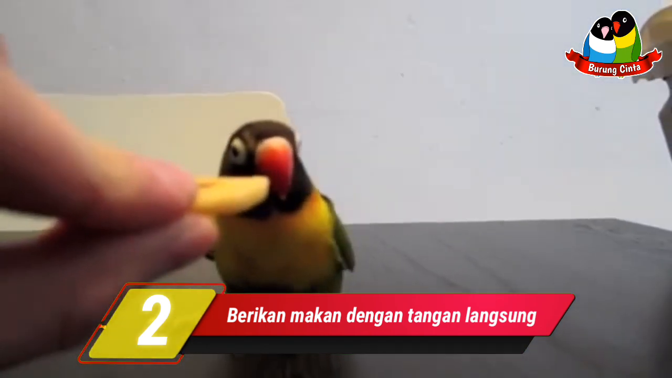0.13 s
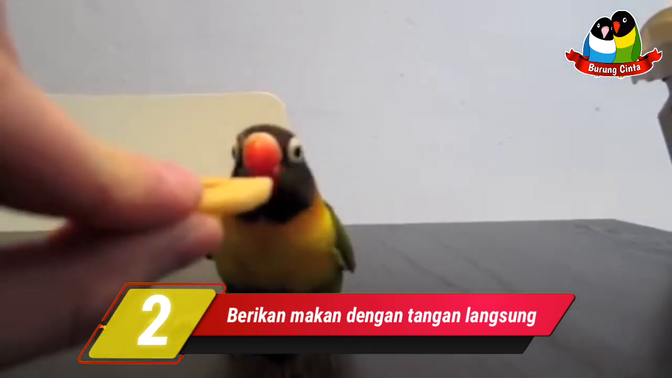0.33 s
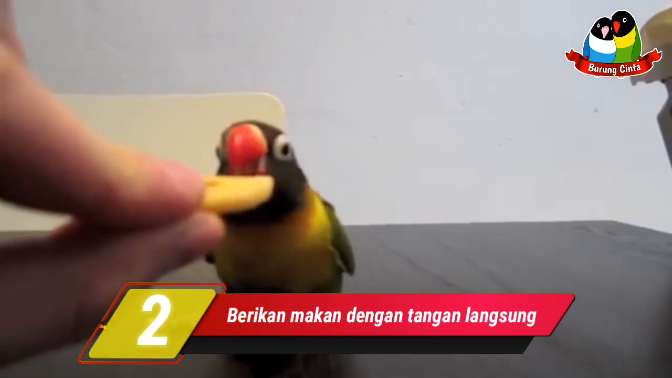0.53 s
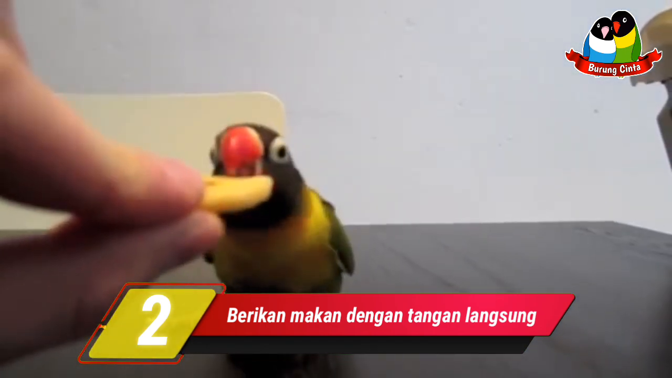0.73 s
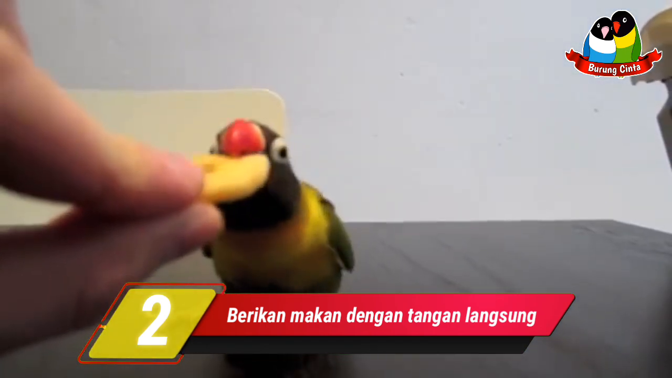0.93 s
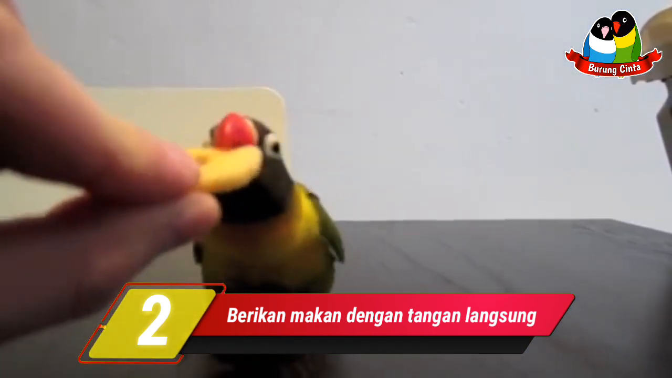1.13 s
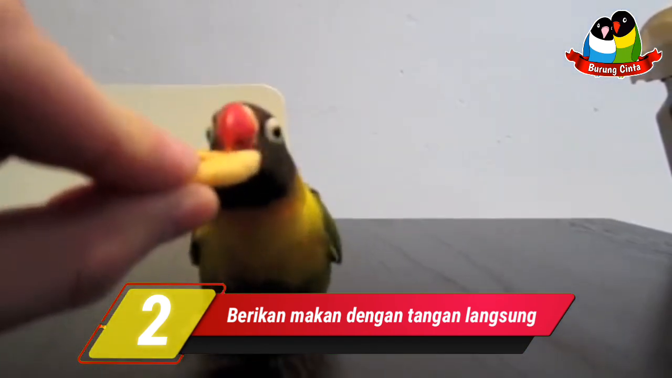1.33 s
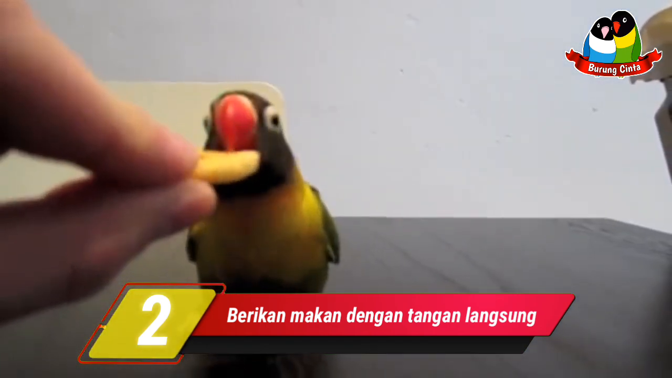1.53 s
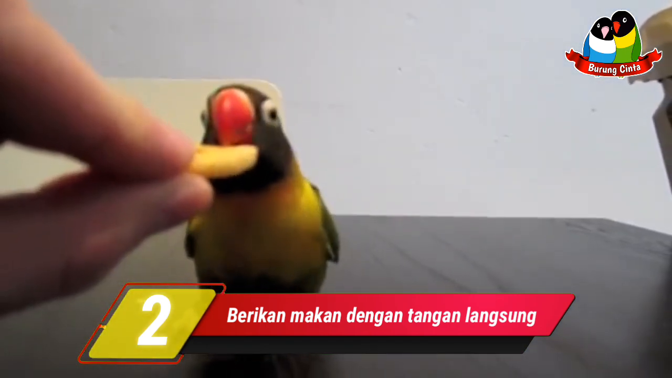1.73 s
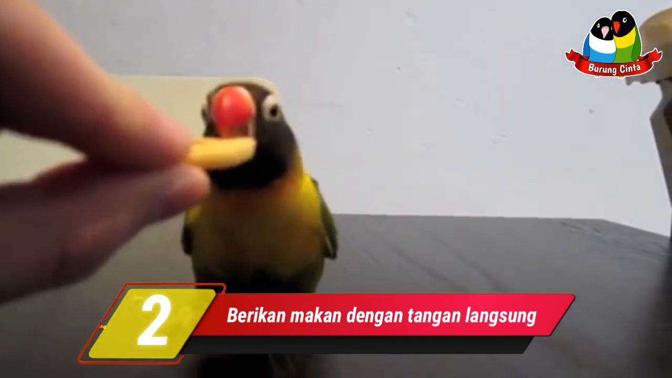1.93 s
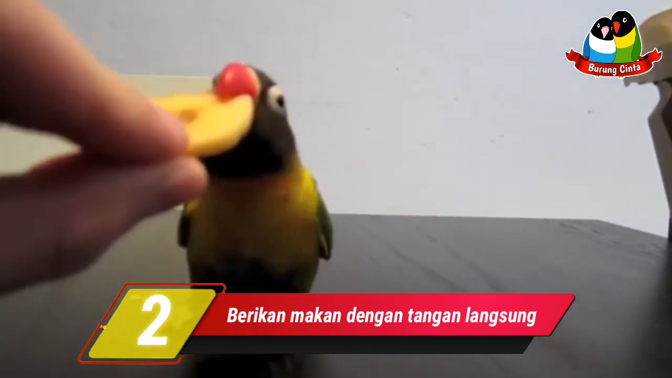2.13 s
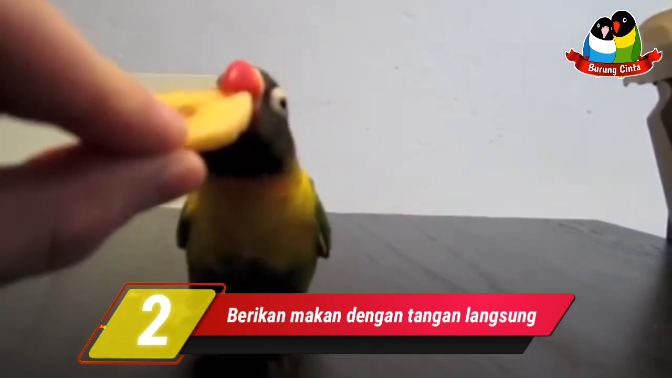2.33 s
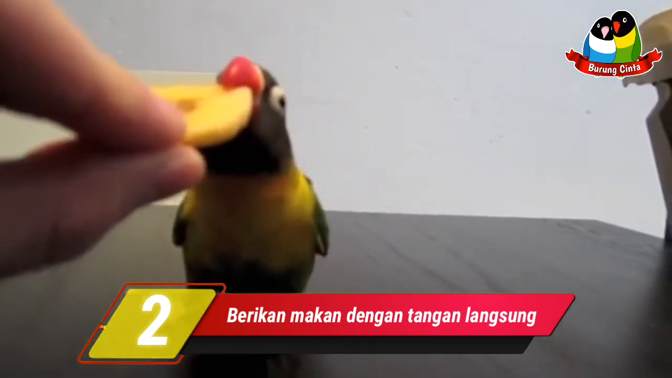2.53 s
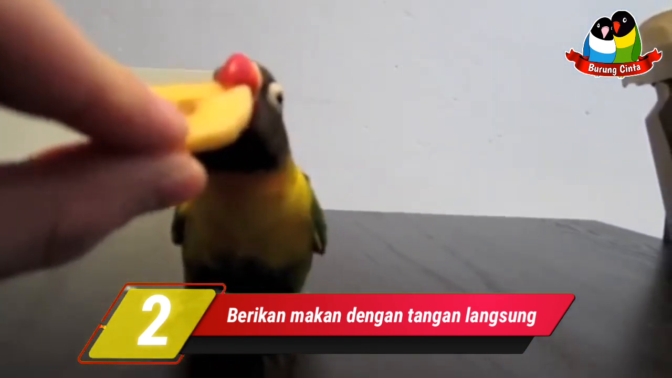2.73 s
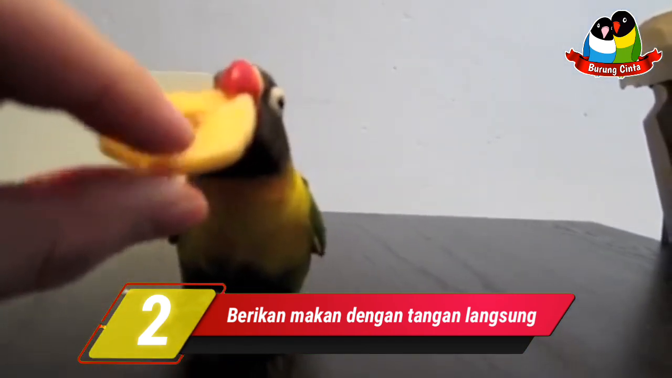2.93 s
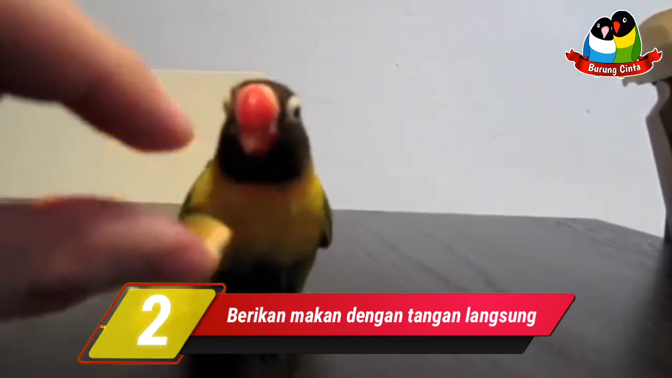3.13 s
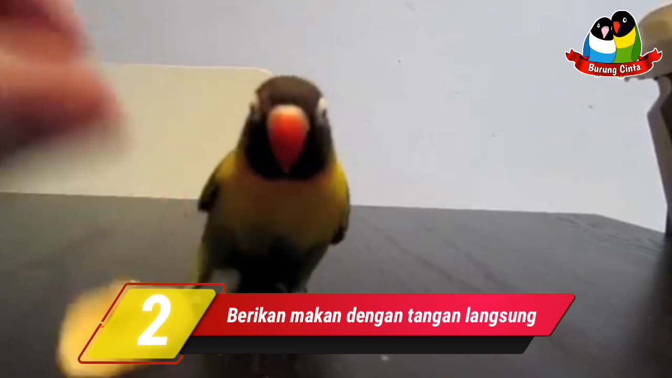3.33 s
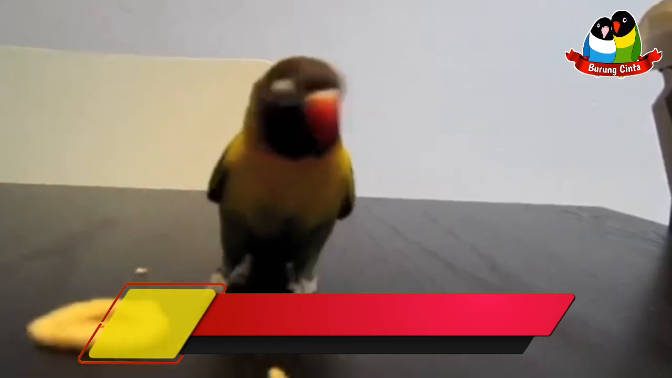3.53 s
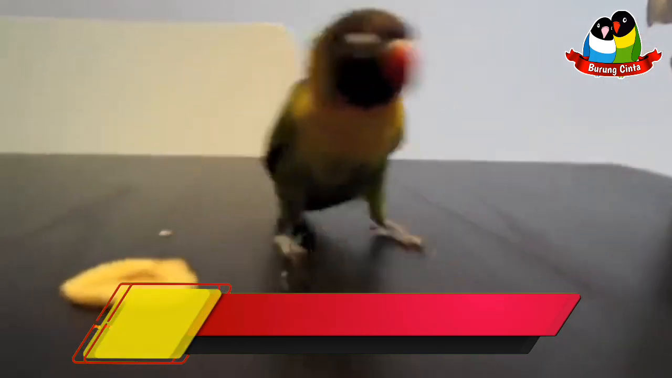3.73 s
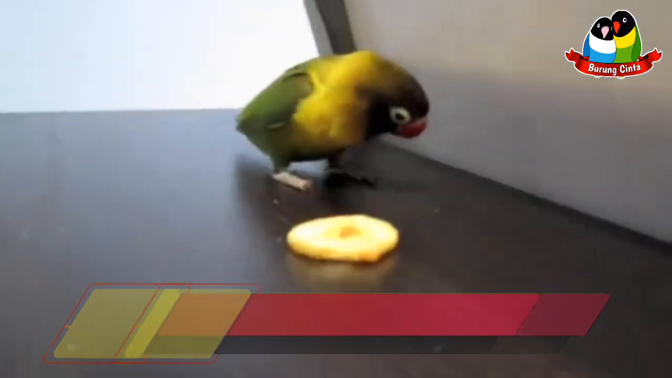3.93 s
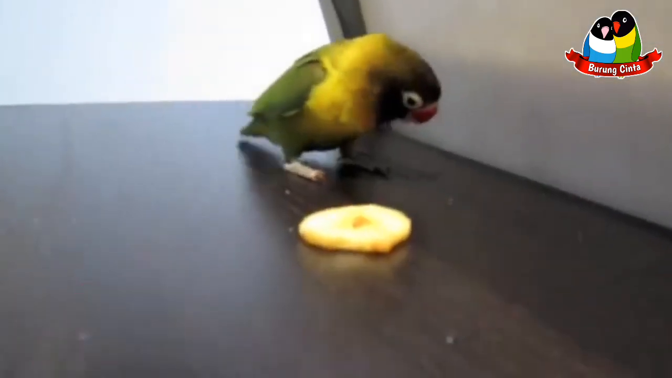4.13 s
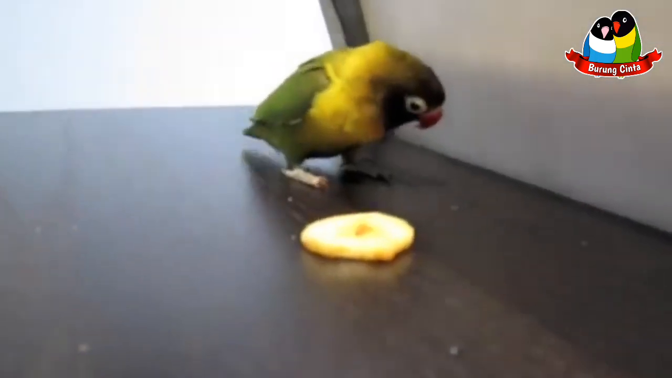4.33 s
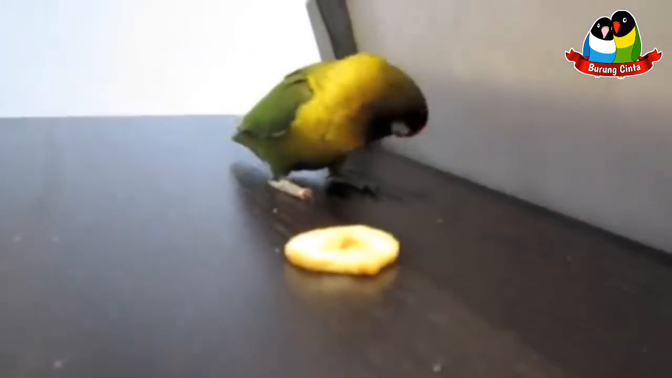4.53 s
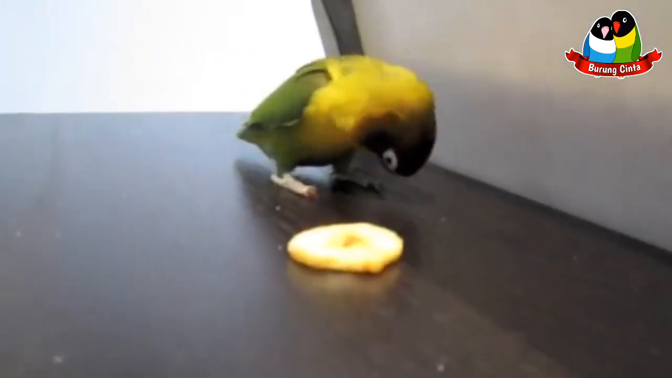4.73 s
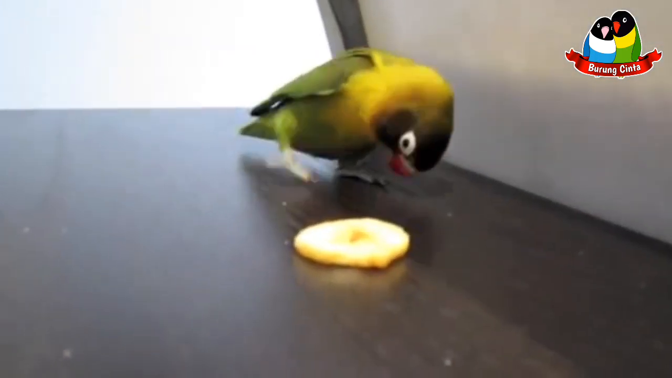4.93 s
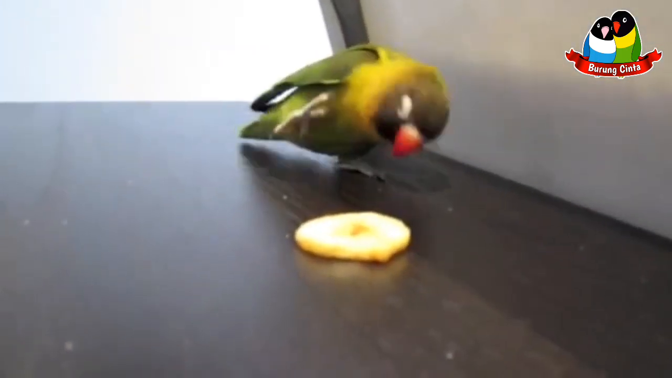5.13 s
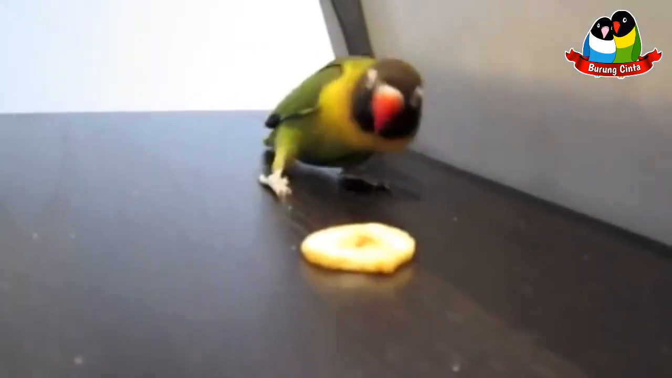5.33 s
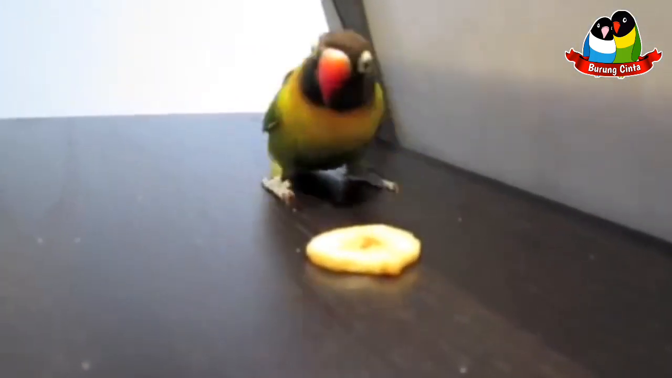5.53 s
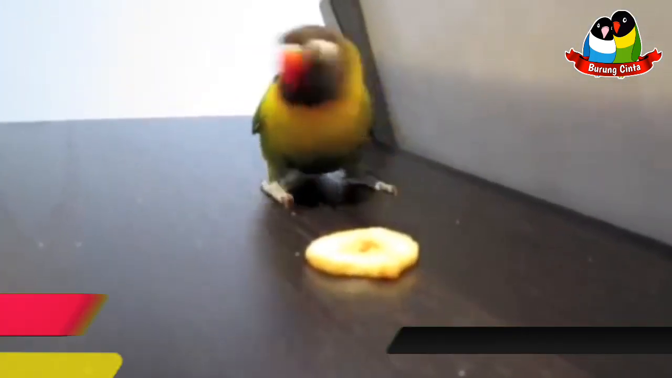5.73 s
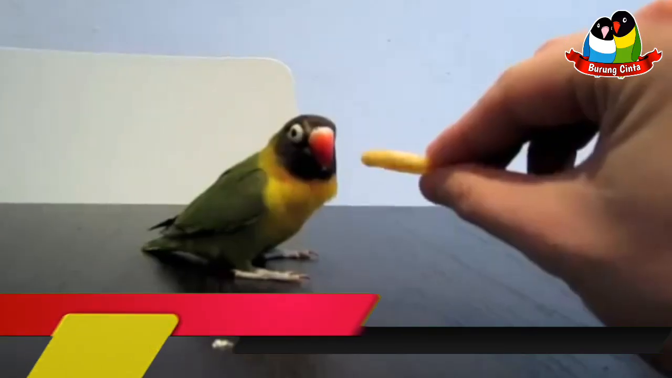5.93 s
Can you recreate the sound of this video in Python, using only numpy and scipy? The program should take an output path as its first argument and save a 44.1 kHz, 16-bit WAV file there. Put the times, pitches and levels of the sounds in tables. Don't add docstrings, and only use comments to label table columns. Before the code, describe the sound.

A small parrot nibbles a dry chip with faint crackles, the chip snaps and clatters loudly onto a table, then two short whistled chirps and claw ticks.

```python
import sys
import numpy as np
from scipy import signal
from scipy.fft import rfft, irfft, next_fast_len
from scipy.io import wavfile
from scipy.ndimage import uniform_filter1d, map_coordinates

SR = 44100
rng = np.random.default_rng(int(sys.argv[2]) if len(sys.argv) > 2 else 0)


def transcribe(u):
    v = np.clip(np.atleast_2d(u).T, -1, 1)
    q = np.round(v * 32767).astype(np.int16)
    wavfile.write(sys.argv[1], SR, q)


def natural_amplitude(level_db):
    exponent = np.asarray(level_db, float) / 20
    return 10 ** exponent


N = 267687
HZ = np.fft.rfftfreq(4096, 1 / SR)
JOIN_S = [3.897, 5.897]

# (centre [Hz], width [Hz], level [dB])
CRUST = [(900, 1700, 18), (2200, 2100, 4), (3700, 2600, -17.5), (5900, 730, -2), (8780, 1900, 3.5),
         (12420, 830, -4)]


def unit(x):
    return x / np.sqrt(np.mean(x ** 2) + 1e-20)


def along(points, hz):
    f, v = np.transpose(points)
    return np.interp(np.log(hz + 1), np.log(f + 1), v)


def curves(rows, t):
    s, *cols = np.transpose(rows)
    return [np.interp(t, s, c) for c in cols]


def resonances(modes):
    total = 0
    for k, (centre, width, db) in enumerate(modes):
        damping = 1j * HZ * width
        total = total + (-1) ** k * natural_amplitude(db) * damping / (centre * centre - HZ * HZ + damping)
    return total


def shaped(x, response):
    y = irfft(rfft(x, 4096) * response)[:3000]
    return y / np.abs(y).max()


def add(track, s, sound):
    track[round(s * SR):][:len(sound)] += sound


def ticks(rows, life, colour):
    track, t = np.zeros(N + SR), np.arange(1024) / SR
    for s, db, hz, octaves in rows:
        spray = 0.35 * rng.standard_normal(len(t)) * natural_amplitude(-60 * t / (3 * life))
        spray[0] = 1.1
        width = hz * max(1.7 * octaves, 0.2)
        body = 0.1 / (1 + 1j * HZ / 2200) ** 2
        band = resonances([(hz, width, 0)]) ** 2 - body
        add(track, s, natural_amplitude(db + 0.5) * shaped(spray, band * colour))
    return track[:N]


def duck_db(t):
    # (time [s], hold [s], hiss gain [dB], rumble gain [dB])
    ducks = [
        (3.173, 0.39, 2, -6),
        (4.215, 0.25, -6.5, -3.5),
        (4.794, 0.51, 3.4, 2.5),
    ]
    attack_s, release_s = 0.05, 0.24
    total = 0
    for s, hold, *db in ducks:
        corners = np.cumsum([s, attack_s, hold, release_s])
        total = total + np.outer(db, np.interp(t, corners, [0, 1, 1, 0]))
    return total


def rush(spectrum, patchy_db):
    hz, _, z = signal.stft(rng.standard_normal(N + 2048), SR, nperseg=2048)
    field = uniform_filter1d(rng.standard_normal(z.shape), 12, 0)
    field = uniform_filter1d(field, 3, 1)
    gain_db = along(spectrum, hz)[:, None] + patchy_db * unit(field)
    return unit(signal.istft(z * natural_amplitude(gain_db), SR, nperseg=2048)[1][:N])


def room_tone():
    # (frequency [Hz], density [dB])
    hiss = [(59, -28), (100, -1.5), (140, -5.5), (200, -2.5), (586, -8), (787, -10.5), (2120, -16.5),
            (5230, -21), (10900, -28), (15300, -35)]
    # (frequency [Hz], density [dB])
    rumble = [(8.8, -27), (15, -0.5), (59, 0.5), (86, -8.5), (107, -14), (119, -17), (160, -12.5),
              (210, -38.5), (350, -120)]
    # (start [s], murmur [dB], rumble [dB], hiss [dB])
    takes = [
        (0, -59, -61, -76),
        (3.897, -58, -59.5, -76),
        (5.897, -58, -57, -76),
    ]
    t = np.arange(N) / SR
    murmur_db, rumble_db, hiss_db = np.array(takes)[np.searchsorted(JOIN_S, t), 1:].T
    drift = map_coordinates(rng.standard_normal(60), [t * 8])
    swell_db = 1.55 * map_coordinates(rng.standard_normal(40), [t * 2])
    hum = natural_amplitude(-60 + 2 * drift) * np.sin(2 * np.pi * 60 * t + 0.37 * drift)
    air = rush(hiss, patchy_db=0.88)
    murmur = signal.filtfilt(*signal.butter(1, 0.2), air)
    low = natural_amplitude(rumble_db + 3) * rush(rumble, patchy_db=1.0) + hum
    high_db, low_db = duck_db(t)
    steady = natural_amplitude(hiss_db + 14.5 + high_db) * (air - murmur) + natural_amplitude(low_db) * low
    return natural_amplitude(murmur_db + swell_db + 0.35 * high_db) * murmur + steady


def far_calls():
    # (time [s], level [dB], pitch [Hz], half length [s])
    calls = [
        (.665, -68, 2150, .025),
        (4.85, -65, 3900, .035),
        (5.085, -64, 3900, .06),
        (5.09, -70, 3300, .025),
        (5.385, -63, 950, .045),
    ]
    track = np.zeros(N + SR)
    for s, db, hz, length in calls:
        t = np.arange(-length, length, 1 / SR)
        blur = signal.lfilter(*signal.iirpeak(hz, 18, SR), rng.standard_normal(SR // 4))
        swell = np.exp(-(1.5 * t / length) ** 4)
        add(track, s - length, natural_amplitude(db) * unit(blur[-len(t):]) * swell)
    return track[:N]


def rustles():
    # (time [s], level [dB], centre [Hz], half length [s])
    brushes = [(0.169, -55, 1300, 0.1), (0.296, -60, 2260, 0.094), (0.058, -44, 1290, 0.0081),
               (0.283, -48.5, 900, 0.0075), (0.369, -52.5, 1340, 0.024), (0.645, -61.5, 1960, 0.037),
               (1.1, -68, 5000, 0.06), (1.177, -59, 8400, 0.038), (1.226, -63, 10000, .008),
               (1.7, -60, 2970, 0.031), (2.052, -54, 2440, 0.018), (2.145, -66, 9000, 0.032),
               (2.411, -66, 2970, 0.028), (3.142, -53.5, 3020, 0.03), (3.743, -60, 9000, 0.014),
               (4.046, -70, 2550, .04), (4.78, -65, 1190, 0.018), (5.014, -65, 7000, 0.055),
               (5.083, -59.5, 2020, 0.15), (5.367, -59.5, 7040, 0.036), (0.173, -66, 11000, 0.063),
               (0.376, -66, 12000, 0.047), (3.807, -58, 2850, .2), (5.249, -59, 348, .2),
               (5.4, -59, 1210, 0.14), (4.832, -62, 2470, 0.048), (3.437, -46, 8700, 0.0064),
               (3.586, -50.5, 10800, 0.016)]
    track = np.zeros(N + SR)
    for s, db, hz, length in brushes:
        t = np.arange(-length, length, 1 / SR)
        clumps = np.repeat(natural_amplitude(rng.normal(0, 4.5, size=400)), repeats=60)
        peak = signal.iirpeak(hz, 0.7, SR)
        grains = rng.standard_normal(len(clumps)) * clumps
        band = signal.lfilter(*peak, signal.lfilter(*peak, grains))
        swell = np.exp(-(2 * t / length) ** 2)
        add(track, s - length, natural_amplitude(db) * unit(band[:len(t)]) * swell)
    return track[:N]


def thumps():
    # (time [s], peak [dB], low mode [Hz], upper mode [Hz], width [Hz])
    knocks = [
        (2.7671, -28.5, 183, 790, 163),
        (3.194, -25, 128, 348, 197),
        (5.595, -34.5, 133, 505, 46),
    ]
    track = np.zeros(N + SR)
    for s, db, low_hz, upper_hz, width in knocks:
        modes = [(low_hz, 0.7 * width, 0), (upper_hz, width, -1.5), (1100, 2.3 * width, -12)]
        add(track, s, natural_amplitude(db) * shaped(np.hanning(30), resonances(modes)))
    return track[:N]


def claws():
    # (time [s], peak [dB], centre [Hz], width [octaves])
    steps = [(3.9368, -37.5, 3900, 0.8), (3.966, -49, 2950, 0.59), (3.975, -50, 2150, 1.3),
             (4.03, -47, 3470, 0.44), (4.0432, -37, 2330, 2), (4.0578, -46, 3460, 0.22),
             (4.09, -44, 1660, 1.8), (4.1757, -39, 1500, 3.4), (4.183, -46, 2440, 1.4),
             (4.1925, -31.5, 1500, 1.6), (4.1956, -29.5, 9560, 1), (4.7752, -37.5, 1400, 1.5),
             (4.785, -42.5, 1680, 1.2), (4.8871, -49, 1930, 1.4), (4.9395, -52, 4220, 1.2),
             (4.9648, -51.5, 2870, 0.8), (4.968, -46, 3380, 1.26), (5.3627, -44, 4470, 1.1),
             (5.597, -50, 1650, 1.5), (5.827, -62, 2704, 0.81)]
    return ticks(steps, 0.0039, resonances(CRUST))


def locked(spans, t):
    slip_db_per_s = 5000
    total = 0
    for start, end, db in spans:
        outside = np.maximum(0, np.maximum(start - t, t - end))
        total = total + natural_amplitude(db - slip_db_per_s * outside)
    return total


def chirp():
    # (time [s], pitch [Hz], level [dB], octave over the pitch [dB])
    notes_sung = [
        [(4.2105, 4750, -45, -10), (4.2122, 4650, -10, -17), (4.216, 4570, -13.5, -17),
         (4.225, 4480, -15.5, -14), (4.231, 4435, -19, -12), (4.238, 4600, -16, -17), (4.2435, 4620, -17, -25),
         (4.2458, 4200, -31, -21), (4.253, 3600, -44, -25)],
        [(4.271, 4250, -50, -12), (4.274, 4100, -30, -14), (4.279, 4012, -24, -20), (4.289, 3985, -19.8, -32),
         (4.302, 4005, -19, -25), (4.309, 4030, -24, -14), (4.313, 4200, -34, 3), (4.318, 4250, -37, 6),
         (4.321, 4200, -65, 0)],
    ]
    # (multiple of a third of the pitch, level [dB]), then of half the pitch
    thirds = [(1, -13), (2, -3), (4, -2.5), (5, -3), (7, -11), (8, -17), (10, -20.5)]
    halves = [(1, -4), (3, -0.5), (5, -5)]
    # (start [s], end [s], level [dB])
    thirds_lock = [(4.212, 4.218, -11), (4.219, 4.2245, -16), (4.238, 4.239, -22)]
    halves_lock = [(4.228, 4.236, -15)]
    # (start [s], end [s], level [dB])
    hoarse = [
        (4.2105, 4.216, -11),
        (4.236, 4.2395, -13),
        (4.272, 4.274, -12),
    ]
    track = np.zeros(N + SR)
    for note in notes_sung:
        t = np.arange(note[0][0], note[-1][0], 1 / SR)
        hz, db, octave_db = curves(note, t)
        flutter = map_coordinates(rng.standard_normal(90), [np.arange(len(t)) / SR * 900])
        phase = 2 * np.pi * np.cumsum(hz * (1 + 0.0048 * flutter)) / SR
        tone = np.sin(phase) + natural_amplitude(octave_db) * np.sin(2 * phase)
        tone += natural_amplitude(-31.5 - 25 * (hz < 3950)) * np.sin(3 * phase)
        tone += locked(thirds_lock, t) * sum(natural_amplitude(level) * np.cos(k * phase / 3) for k, level in thirds)
        tone += locked(halves_lock, t) * sum(natural_amplitude(level) * np.cos(k * phase / 2) for k, level in halves)
        breath = signal.lfilter(*signal.butter(2, 0.12), rng.standard_normal(len(t)))
        add(track, t[0], natural_amplitude(db + 2.6) * tone * (1 + (natural_amplitude(-24) + locked(hoarse, t)) * breath))
    beak_opens = resonances([(1200, 900, -4), (6000, 4000, 0)]) / (1 + 1j * HZ / 9000)
    add(track, 4.2108, natural_amplitude(-21) * shaped(rng.standard_normal(60), beak_opens))
    return track[:N]


def nibbling():
    # (time [s], peak [dB], centre [Hz], width [octaves])
    bites = [(0.0302, -39, 5000, 2.7), (0.0566, -35.5, 7700, 0.53), (0.0608, -28, 7140, 1.2),
             (0.2646, -34.5, 2610, 0.77), (0.28, -30, 5800, 1.2), (0.842, -43, 5260, 0.62),
             (0.9312, -31.5, 4950, 0.53), (1.0847, -42, 5950, 5), (1.094, -46.7, 8290, 1.2),
             (1.0974, -39, 6540, 3.1), (1.315, -46, 4230, 0.69), (1.3287, -46.5, 3700, 0.71),
             (1.523, -44, 2750, 0.9), (1.548, -43, 4170, 1.3), (1.682, -43, 3530, 1.5),
             (1.6902, -36.5, 3550, 1.3), (1.71, -42, 3440, 1.6), (1.882, -40.5, 3200, 0.53),
             (1.9344, -37, 4200, 0.93), (2.0117, -38.5, 3450, 0.75), (2.048, -41, 7000, 4),
             (2.0578, -43, 2910, 0.92), (2.0703, -24.5, 4540, 0.62), (2.0844, -42.5, 3390, 0.84),
             (2.1287, -36, 7700, 0.32), (2.4049, -43, 3550, 0.85), (2.4085, -36.5, 3170, 1.3),
             (2.9856, -33.5, 3000, 1.8)]
    # (time [s], peak [dB])
    light = [(0.0424, -51), (0.0727, -41), (0.1144, -44.5), (0.6417, -45.5), (0.8315, -59), (0.9179, -52),
             (1.1363, -55), (1.3208, -47), (1.3657, -46), (1.3966, -48.5), (1.4953, -46.5), (1.4995, -61),
             (1.5444, -50), (1.6937, -42), (1.6974, -48), (1.8162, -49), (1.8728, -48), (1.8988, -50),
             (1.9408, -54), (1.9717, -48), (1.9884, -56), (2.0051, -50), (2.0532, -48), (2.1158, -45),
             (2.3962, -54), (2.4286, -49), (2.7666, -53), (2.7993, -56), (3.1528, -30)]
    nibbles = []
    for (s, db), chance in zip(light, rng.standard_normal(40)):
        nibbles.append((s, db, 3900 * natural_amplitude(1.4 * chance), 1.3))
    return ticks(bites + nibbles, 0.0021, resonances(CRUST))


def snap():
    # (centre [Hz], width [Hz], level [dB])
    shell = [(900, 900, -7), (2250, 1500, 2), (5100, 1900, -.5), (8800, 1200, -12), (11500, 2500, -10)]
    # (time [s], peak [dB], centre [Hz], width [octaves])
    breaks = [
        (3.1357, -2.5, 3470, 3.8),
        (3.1946, -15, 7060, 0.55),
    ]
    # (time [s], peak [dB], centre [Hz], width [octaves])
    crackle = [
        (3.1166, -17, 3920, 3.6),
        (3.1182, -27.5, 3530, 4.2),
        (3.1203, -24.5, 3500, 3.6),
        (3.1225, -28.5, 3620, 5),
    ]
    crack = resonances(shell)
    return ticks(breaks, 0.0007, crack) + ticks(crackle, 0.002, crack - 0.35)


def scatter(modes):
    return [(hz * (1 + rng.normal(0, 0.03)), w, db + rng.normal(0, 2)) for hz, w, db in modes]


def chip():
    # (time [s], peak [dB], bright edge [dB], travel at 1 kHz [s])
    bounces = [(3.1941, -2, -40, 0.0017), (3.2942, -20.5, 6, 0.0035), (3.3025, -17.5, -1, 0.0024),
               (3.314, -33, -15, 0.00096), (3.3189, -18, -18, .0015), (3.3565, -20.5, -8, 0.0014),
               (3.384, -28.5, -25, 0.0017), (3.4062, -29, -11, 0.0016), (3.409, -30.5, -0.5, 0.0021),
               (3.4173, -38.5, -14.5, 0.0014), (3.431, -28, -25, 0.0027), (3.4339, -21, -23.5, 0.0027),
               (3.4441, -18.5, 1, 0.0016), (3.471, -22.5, -5, 0.0016), (3.51, -21.5, 0.5, 0.0032),
               (3.5221, -12, 1.5, 0.0017), (3.5345, -22.5, -3, 0.0014), (3.557, -23, -9, 0.0017),
               (3.575, -22, 0.5, 0.0015), (3.581, -34, -18.5, 0.0014), (3.605, -23, -22.5, .0015),
               (3.6215, -27, -9.5, .0015), (3.6314, -29.5, -22, 0.0012)]
    # (centre [Hz], width [Hz], level [dB])
    table_modes = [(710, 140, -3), (1057, 81, 12), (1636, 220, 2.5), (2367, 1000, 8.5), (3400, 1600, -3)]
    # (centre [Hz], width [Hz], level [dB])
    chip_modes = [(4340, 1660, 11.5), (5710, 990, 22.5), (7930, 2500, -6), (10920, 2200, -35.5)]
    track, t = np.zeros(N + SR), np.arange(2600) / SR
    dull = 1j * HZ / (500 + 1j * HZ) / (1 + 1j * HZ / 5000) ** 2
    dull = dull / (1 - (HZ / 3900) ** 2 + 1j * HZ / 3700) ** 3
    for s, db, edge_db, travel in bounces:
        delay = (HZ / 1000) ** 0.3 / 0.3 - HZ / 9000
        bending = np.exp(-2j * np.pi * travel * 1000 * delay)
        blow = rng.standard_normal(len(t)) * natural_amplitude(-60 * t / 0.00059)
        shudder = natural_amplitude(-19) * rng.standard_normal(len(t)) * natural_amplitude(-60 * t / 0.036)
        shudder *= np.clip(t / 0.0021, 0, 1)
        table_top = (resonances(scatter(table_modes)) + 0.81) * dull
        wood = shaped(np.r_[2.5, 0.3 * blow + shudder], table_top * (bending + 0.44))
        click = shaped(blow, resonances(scatter(chip_modes)) * bending / (1 + 1j * HZ / 7000) ** 2)
        add(track, s - 0.088 * travel, natural_amplitude(db - 2) * (wood + natural_amplitude(edge_db) * click))
    return track[:N]


def room(x, gap):
    # (frequency [Hz], time to fall 60 dB [s])
    decay = [(200, 1), (1000, 1), (2500, 0.87), (4000, 0.57), (4600, 0.46), (6000, 0.54), (9000, 0.33),
             (14000, 0.24)]
    hz, t, z = signal.stft(rng.standard_normal(SR), SR, nperseg=256)
    tail = signal.istft(z * natural_amplitude(-60 * t / along(decay, hz)[:, None]), SR, nperseg=256)[1]
    tail *= np.clip(np.arange(len(tail)) / SR / gap, 0, 1)
    return signal.fftconvolve(x, tail / np.linalg.norm(tail))[:N]


def scattered(x, bounds, gap):
    stretch = np.searchsorted(bounds, np.arange(N) / SR)
    return sum(room(x * (stretch == k), gap) for k in range(len(bounds) + 1))


def scene():
    small = nibbling() + claws() + snap() + thumps()
    drop, voice = chip(), chirp()
    thrown = signal.lfilter(*signal.butter(1, 0.2, "high"), voice)
    roll_s, head_turn_s = [3.29, 3.43, 3.505, 3.57], [4.227, 4.262]
    wet = natural_amplitude(-21.5) * room(small, gap=0.014)
    wet += natural_amplitude(-15) * scattered(drop, roll_s, gap=0.0099)
    wet += natural_amplitude(-16) * scattered(thrown, head_turn_s, gap=0.015)
    return (small + drop + voice + wet + rustles() + far_calls() + room_tone())[None]


def joins():
    t = np.arange(N) / SR
    fade_out_s, fade_in_s = 0.082, [0.043, 0.073]
    dips = [np.interp(t, [s - fade_out_s, s, s + rise], [1, 0, 1]) for s, rise in zip(JOIN_S, fade_in_s)]
    return np.prod(dips, axis=0)


def roll_off(x):
    return signal.sosfilt(signal.butter(12, 16550, fs=SR, output="sos"), x)


def record(dry):
    # (frequency [Hz], gain [dB])
    treble_limit = [(20, 0), (14950, 0), (15150, -17), (16400, -22), (16600, -90)]
    clipped = dry / (1 + np.abs(dry / 0.52) ** 8) ** (1 / 8)
    padded = next_fast_len(N + SR)
    gain = natural_amplitude(along(treble_limit, np.fft.rfftfreq(padded, 1 / SR)))
    limited = irfft(rfft(clipped, padded) * gain, padded)[:, :N]
    return roll_off(limited * joins())


dry = scene()
out = record(dry)
transcribe(out)
```